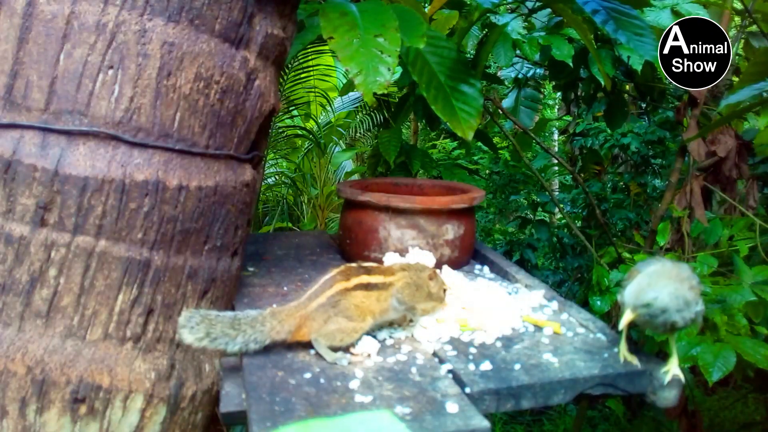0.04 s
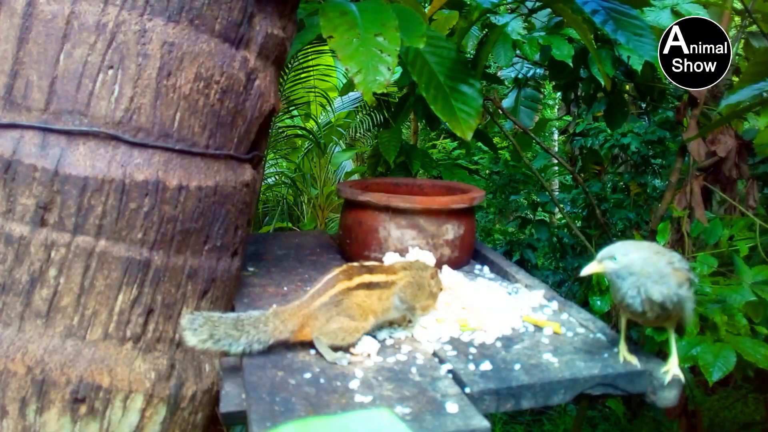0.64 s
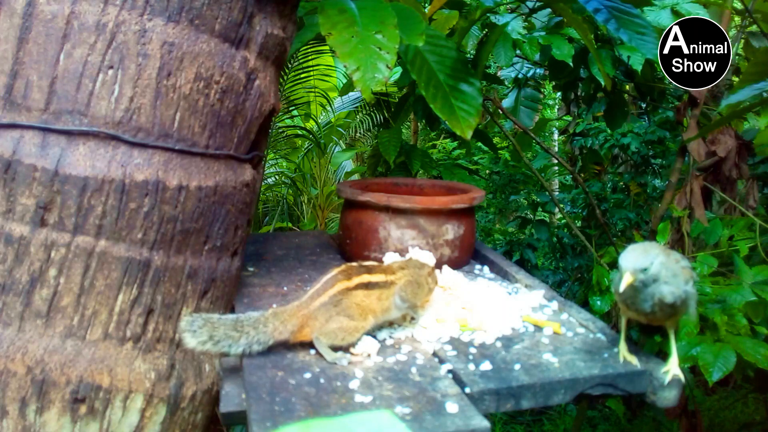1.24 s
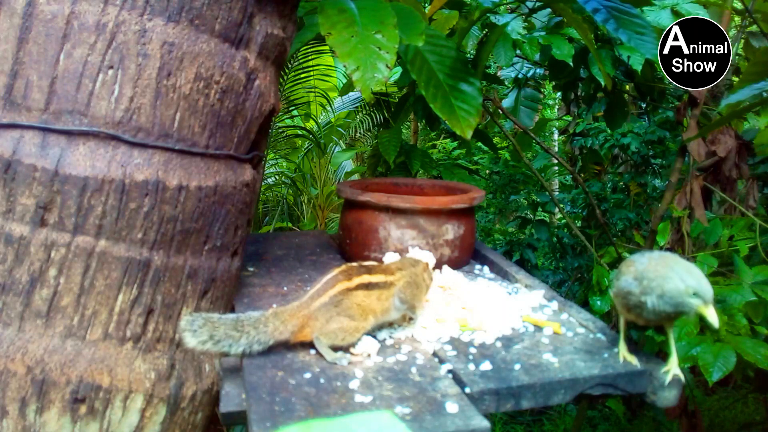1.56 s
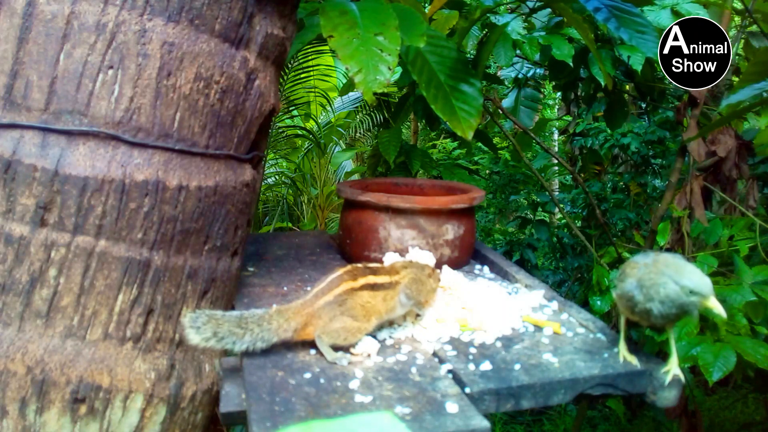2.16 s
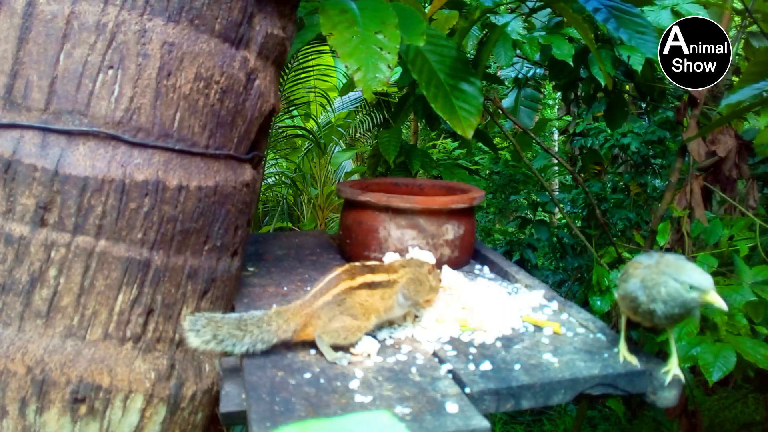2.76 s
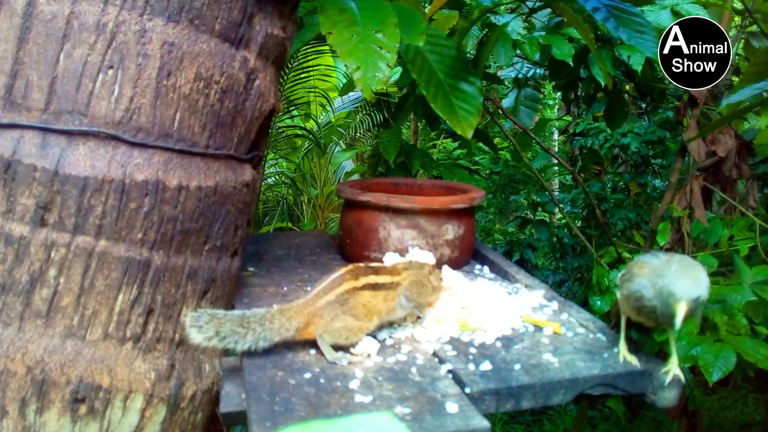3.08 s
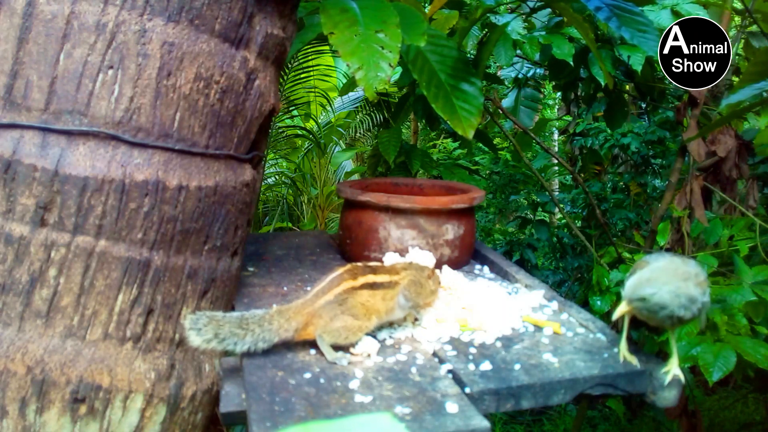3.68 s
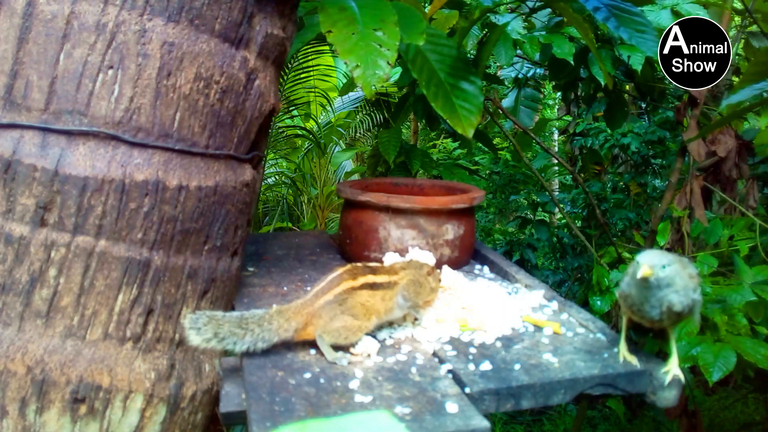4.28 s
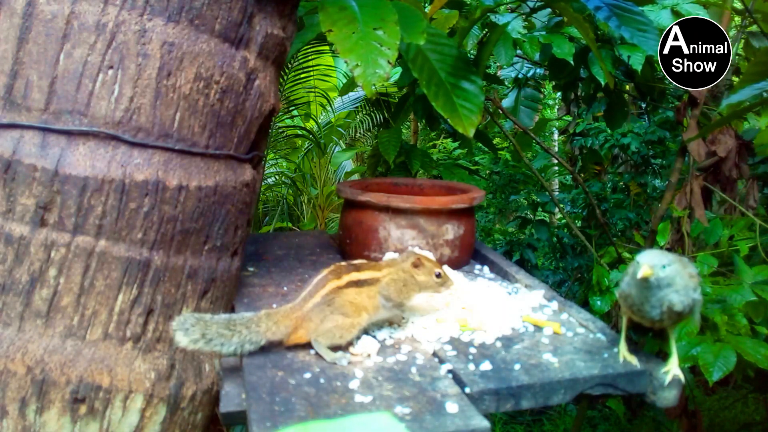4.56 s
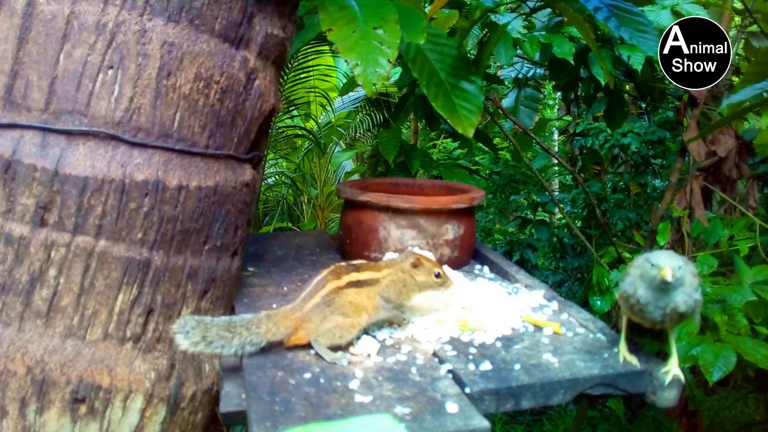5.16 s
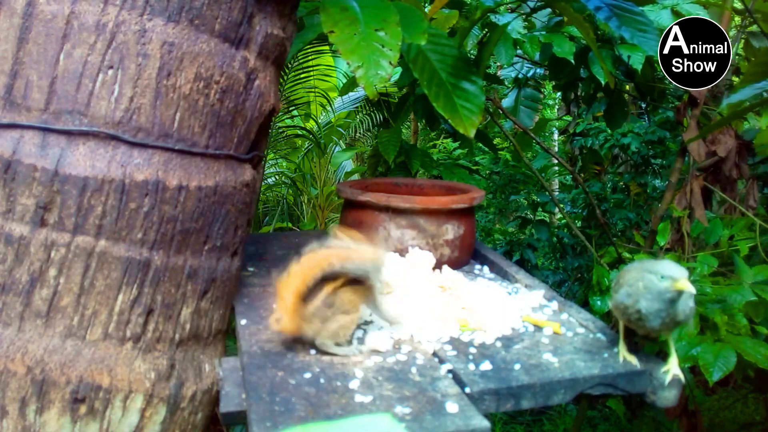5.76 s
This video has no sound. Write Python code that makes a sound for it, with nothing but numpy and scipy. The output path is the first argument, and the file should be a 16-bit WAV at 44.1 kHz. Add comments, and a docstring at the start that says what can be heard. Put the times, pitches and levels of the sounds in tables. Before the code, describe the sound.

In a leafy garden, a bird repeats short, sharp chirps, some clear and some harsh, while others whistle farther off. Past the middle, a second bird adds a few thin, high squeals. At the end a squirrel squeaks briefly and bolts, its feet thumping a board and its claws scratching bark close to the microphone. Faint pulsing insects and a low rumble of distant traffic lie underneath.

```python
"""A bird repeats sharp chips, some clear and some harsh, in a leafy garden where a babbler and a palm
squirrel feed on a board. The babbler squeals with both sides of its syrinx; other birds whistle farther
off, scattered by the foliage. At the end the squirrel squeaks and bolts up a trunk, thumping the board
and scratching the bark. Behind them lie pulsing insects, a distant idling engine, far traffic and a
thin high hiss."""
import sys
import numpy as np
from scipy import signal
from scipy.fft import rfft, irfft, next_fast_len
from scipy.io import wavfile
from scipy.ndimage import map_coordinates

SR = 44100
rng = np.random.default_rng(int(sys.argv[2]) if len(sys.argv) > 2 else 0)


def persist_wave(psi):
    """Save psi, clipped to +-1, as 16-bit WAV."""
    counts = np.round(np.clip(psi, -1, 1) * 32767).astype(np.int16)
    wavfile.write(sys.argv[1], SR, np.atleast_2d(counts).T)


N = 265923
TIME = np.arange(N) / SR
CUTOFF_HZ = 15850

# chip cues: (time [s], top pitch [Hz], relative level [dB], harshness [0-1], brightness [dB])
CHIPS = [(-.06, 2537, -44, .05, 3.5), (0.221, 2500, -35, 0.36, 0), (1.694, 2586, -33.5, 0.3, -2),
         (2.079, 2541, -34.5, 0, 1.5), (2.333, 2523, -35, 0.5, 0.5), (2.720, 2530, -34.5, 0.2, 0.5),
         (4.371, 2605, -32.5, 0.1, 1.5), (4.734, 2600, -35, 0.65, 0), (4.958, 2595, -34, 0.6, 2),
         (5.256, 2579, -33, 0.27, 1), (5.543, 2546, -34.5, .05, 2.5), (5.867, 2535, -34, 0.12, 4.5)]
# a clear chip slides up, leaps and holds: (time from cue [s], pitch [ratio], gain [dB])
CLEAR_CHIP = [(-.015, .7, -22), (-.009, .75, -11), (-.004, .81, -8), (-.001, .93, -5), (.003, .995, 0),
              (.013, 1, 0), (.016, .97, -8), (.019, .85, -30)]
# a harsh chip dips in the middle: (time from cue [s], pitch [ratio], gain [dB])
HARSH_CHIP = [(-.012, 0.94, -48), (-.006, 0.97, -3.5), (0, 1, -1), (.004, .88, -4.5), (.01, .86, -3.5),
              (.015, 1, 0.5), (.02, 1, -2.5), (.027, 0.83, -33)]
# the raw tone at the syrinx, harmonic by harmonic: (gain [dB])
CHIP_PARTIALS = [-0.5, -1, -0.5, -17, -21, -13]
# throat resonances: (frequency [Hz], gain [dB])
CHIP_THROAT = [(1500, -24), (1900, -1), (2540, -2), (3100, -10), (3900, -2.5), (4450, -14.5), (5080, -6.5),
               (5450, -6.5), (5850, -1), (7600, -22), (8400, -28), (11500, -10), (15300, -14)]
def chips(jitter=0.0022, harsh_jitter=0.019, onset_jitter=0.06, hiss_db=-12, harsh_hiss_db=9, trim_db=2):
    """Short calls from a perch, hoarse as the voice starts; a harsh one stays unsteady and hisses."""
    out = np.zeros(N)
    t = span(-.015, .028)
    for cue, top_hz, db, harsh, bright_db in CHIPS:
        ratio, shape_db = along(HARSH_CHIP if harsh > .5 else CLEAR_CHIP, t)
        unsteady = jitter + harsh_jitter * harsh + onset_jitter * (t < 0)
        hz = top_hz * ratio * (1 + unsteady * wobble(1126, t))
        partials_db = [CHIP_PARTIALS[0]] + [overtone + bright_db for overtone in CHIP_PARTIALS[1:]]
        tone = voice(hz, partials_db) * from_db(shape_db)
        # air hisses before the tone has built up, so its envelope is flatter
        air_db = hiss_db + bright_db + harsh_hiss_db * harsh + 0.27 * shape_db
        hiss = from_db(air_db) * rng.standard_normal(len(t))
        call = coloured((tone + hiss) * from_db(db + trim_db) * gate(t), CHIP_THROAT)
        add(out, cue + t[0], garden(call, wet_db=-5, shade_hz=2470, t60=0.33, gap=0.0087))
    return out


def puffs(delay=.03, length=0.042, gain_db=-28):
    """A faint low puff follows each chip."""
    out = np.zeros(N)
    for cue, _, db, _, _ in CHIPS:
        t, u = note(cue + delay, length)
        add(out, t[0], from_db(db + gain_db) * np.sin(np.pi * u) * band_noise(t, 600, 1050))
    return out


# loud arched squeals, low side of the syrinx:
# (time [s], length [s], top pitch [Hz], level [dB], fall [share of pitch], overtone drive [dB])
SQUEALS = [(3.76, .066, 5130, -31, 0.201, -15), (4.368, 0.064, 5320, -32, 0.21, -12.5),
           (4.417, 0.053, 5014, -34, .06, -7.5), (4.472, .065, 5163, -32.5, .19, -14)]
# slurs, high side: (time [s], length [s], first pitch [Hz], last pitch [Hz], level at resonance [dB])
SLURS = [(3.759, 0.032, 6390, 6140, -32), (3.925, .061, 7330, 6200, -35), (4.112, 0.011, 6200, 6250, -45),
         (4.425, 0.068, 7700, 6330, -37.5)]
# soft falling peeps, mostly heard at the octave:
# (time [s], length [s], first pitch [Hz], last pitch [Hz], level [dB], overtone drive [dB])
PEEPS = [(3.708, 0.054, 4720, 4560, -68, -0.5), (3.911, 0.045, 5020, 4080, -67.5, 12),
         (4.071, .035, 5010, 4620, -73.5, 13.5), (5.585, 0.034, 5100, 4830, -66.5, 7.5)]
def babbler(crest=0.553, scoop=0.0396, attack_db=11, release_db=10.5, beak_hz=6110):
    """Two voices: one scoops up and drops away, the other slides down above it; soft peeps between."""
    out = np.zeros(N)
    for start, length, top_hz, db, fall, overtone_db in SQUEALS:
        t, u = note(start, length)
        rising = np.maximum(1 - u / crest, 0) ** 2
        falling = np.maximum((u - crest) / (1 - crest), 0) ** 1.7
        roughness = 0.017 * np.sqrt(falling) * wobble(1500, t)
        hz = top_hz * (1 - scoop * rising - fall * falling + roughness)
        add(out, start, babbler_note(t, hz, db - attack_db * rising - release_db * falling, overtone_db))
    for start, length, first_hz, last_hz, db in SLURS:
        t, u = note(start, length)
        hz = first_hz + (last_hz - first_hz) * np.sin(np.pi * u ** 1.6 / 2) ** 2
        off_beak_db = 36 * np.abs(np.log2(hz / beak_hz))   # a slur swells near the beak's resonance
        add(out, start, babbler_note(t, hz, db - off_beak_db, overtone_db=-17))
    for start, length, first_hz, last_hz, db, overtone_db in PEEPS:
        t, u = note(start, length)
        add(out, start, babbler_note(t, first_hz + (last_hz - first_hz) * u, db, overtone_db))
    return out


def babbler_note(t, hz, db, overtone_db, jitter=0.0058, rasp=0.17, hiss_db=-12):
    """One thin note; hiss grows with the overtones as the voice is pressed."""
    phase = turning(hz * (1 + jitter * wobble(817, t)))
    hiss = from_db(hiss_db) * band_noise(t, 5600, 11300)
    # notes that sound mainly at the octave have hardly any third harmonic
    third = from_db(-8 - 2 * np.maximum(overtone_db, 0)) * (3 * hz < CUTOFF_HZ) * np.sin(3 * phase)
    # alternate cycles differ a little, which puts weak lines between the harmonics
    between = from_db(-17) * (np.sin(3 * phase / 2) + np.sin(5 * phase / 2)) * (overtone_db < 0)
    overtones = from_db(overtone_db + 2.5) * (np.sin(2 * phase) + third + between + hiss)
    call = (np.sin(phase) + overtones) * (1 + rasp * wobble(697, t))
    call *= np.sqrt(2) * from_db(db) * gate(t, edge=0.0023)
    return garden(call, wet_db=-4.3, shade_hz=11700, t60=0.27, gap=0.0016)


# the squirrel's nasal throat: (frequency [Hz], gain [dB])
SQUEAK_THROAT = [(600, -2), (830, 2), (1660, 0.5), (2500, -2.5), (3300, -9), (4200, -14), (5000, -18),
                 (6000, -28), (15000, -26)]
def squirrel_squeak(start=5.85, peak=5.884, end=5.9, slack_hz=592, top_hz=835, jitter=0.22):
    """Effort builds and collapses; pitch and level rise with it, and the hoarse voice clears."""
    out, t = np.zeros(N), span(start, end)
    slack = np.interp(t, [start, peak, end], [1, 0, 1])
    hz = (top_hz + (slack_hz - top_hz) * slack ** 2) * (1 + jitter * slack * wobble(898, t))
    source = voice(hz, np.zeros(18)) * from_db(-30 - 14.5 * slack) * gate(t)
    add(out, t[0], garden(coloured(source, SQUEAK_THROAT), wet_db=-26, shade_hz=14000, t60=0.15))
    return out


# the gritty tone of scrabbling feet: (frequency [Hz], gain [dB])
SCRABBLE_COLOUR = [(60, -6), (200, 16), (600, 0.5), (2000, -7), (5000, -15), (15000, -11.5)]
def scrabble(start=5.735, jump=5.961, fade=0.018, grain_db=3.5):
    """Crumbs scatter and the board shudders, ever louder as the squirrel gathers speed."""
    out, t = np.zeros(N), span(start - fade, N / SR + fade)
    airborne = bump(jump, 0.011, t)   # the crumbs lull during the jump
    crumbs_db = -52.5 + 72.5 * (t - start) - 15 * airborne
    grit = coloured(rng.standard_normal(len(t)), SCRABBLE_COLOUR)
    crumbs = from_db(crumbs_db) * rms_one(grit * from_db(grain_db * wobble(500, t)))
    rumble = from_db(-45 + 39 * (t - start)) * band_noise(t, 45, 150)
    add(out, t[0], (crumbs + rumble) * gate(t, edge=fade))
    return out


# footfalls on the board: (centre time [s], peak level [dB], pitch [Hz])
THUMPS = [(5.8, -30, 80), (5.843, -25, 86), (5.892, -19, 112), (5.94, -11.5, 69), (6.011, -22, 110),
          (6.018, -12, 460), (6.025, -5.5, 131), (6.028, -10, 280)]
def board_thumps(cycles=2.1):
    """Soft feet rock the board for about two cycles."""
    out = np.zeros(N)
    for centre, db, hz in THUMPS:
        length = cycles / hz
        t = span(-length / 2, length / 2)
        envelope = from_db(db) * np.cos(np.pi * t / length) * gate(t)
        add(out, centre + t[0], envelope * np.cos(2 * np.pi * hz * t))
    return out


# claw hits: (time [s], level [dB], low edge [Hz])
SCRATCHES = [(4.065, -51.5, 400), (5.744, -48, 1200), (5.832, -37, 300), (5.906, -36.5, 450),
             (5.947, -36, 900), (5.981, -39, 3000), (6.002, -35, 1500), (6.012, -16.5, 6150),
             (6.024, -20.5, 7540)]
def claw_scratches(decay_s=0.0032, octaves=3):
    """Claws catch on wood and bark in dry, fast-dying bursts of noise."""
    out, t = np.zeros(N), span(0, .06)
    for start, db, low_hz in SCRATCHES:
        add(out, start, from_db(db) * np.exp(-t / decay_s) * band_noise(t, low_hz, low_hz * 2 ** octaves))
    return out


# whistled notes: (time [s], length [s], first pitch [Hz], last pitch [Hz], relative level [dB],
# closing flick [share of pitch], undertone [0-1])
WHISTLES = [(0.518, 0.13, 3640, 3746, -53.5, 0, 0.03), (1.283, 0.14, 3252, 3280, -45.5, 0.12, 0.87),
            (1.453, 0.12, 3326, 3127, -43.5, .11, .7), (1.619, 0.11, 3090, 2945, -42, 0, 0.04),
            (3.107, 0.14, 3570, 3780, -59, 0, 0.1), (3.271, 0.13, 3705, 3820, -64, 0, 0),
            (5.147, .065, 4050, 2950, -60, 0, 0), (5.206, .095, 3350, 3040, -54.5, 0, 0)]
# the whistle's core tone: (pitch multiple [ratio], gain [dB])
WHISTLE_PARTIALS = [(1, -1), (3, -25)]
# its undertone, an octave down: (pitch multiple [ratio], gain [dB])
UNDERTONE_PARTIALS = [(.5, -15.5), (1.5, -25), (2.5, -23)]
def whistles(scoop=.055, sag=0.0126, slide_jitter=0.027, far_below_db=-52):
    """Nearly pure notes glide and sag in the trees; fast slides roughen, far notes blur in echoes."""
    out = np.zeros(N)
    for start, length, first_hz, last_hz, db, flick, undertone in WHISTLES:
        t, u = note(start, length)
        far, rising = db < far_below_db, last_hz > first_hz
        arch = np.sin(np.pi * u)
        glide = (1 + np.tanh((u - .47) / 0.11)) / 2 if far and rising else u   # a step up, or a ramp
        opening = undertone * np.exp(-(t - t[0]) / 0.0161)   # with an undertone it starts soft and flat
        closing = np.clip((t - t[-1] + 0.0266) / .017, 0, 1) * (flick > 0)   # a flick rises and weakens
        bend = 1 - scoop * opening - sag * arch + flick * closing
        hz = (first_hz + (last_hz - first_hz) * glide) * bend
        unsteady = (0.0076 if far else 0.0063) + slide_jitter * (closing + (far and not rising))
        phase = turning(hz * (1 + unsteady * wobble(400, t)))
        tone = sines(phase, WHISTLE_PARTIALS) + undertone * arch * sines(phase, UNDERTONE_PARTIALS)
        level_db = db - 2 * far - 11 * opening - 2.5 * (1.5 - arch) - 2 * closing
        call = np.sqrt(2) * tone * from_db(level_db) * gate(t, edge=0.0032)
        add(out, start, garden(call, wet_db=-2 if far else -9, shade_hz=9000, t60=0.31))
    return out


# soft far calls: (time [s], pitch [Hz], relative level [dB])
FAR_CALLS = [(.56, 2230, -64), (0.789, 2450, -64.5), (1.02, 2200, -63.5), (1.47, 2237, -62),
             (1.98, 2390, -65), (2.44, 4110, -62.5), (2.57, 4170, -63), (2.73, 4360, -61),
             (2.87, 2396, -63.5), (3.26, 2285, -62), (3.42, 1900, -70.5), (3.73, 2310, -59),
             (4.17, 2340, -58.5), (4.62, 2266, -61.5)]
def far_birds(length=0.106, rise=0.031, waver=0.052, trim_db=-2.5):
    """Distant husky calls, each rising a little, arrive mostly as scattered sound."""
    out = np.zeros(N)
    for start, centre_hz, db in FAR_CALLS:
        t, u = note(start, length)
        hz = centre_hz * (1 + rise * (u - .5) + waver * wobble(592, t))
        call = np.sin(turning(hz)) * np.sin(np.pi * u) * from_db(db + trim_db)
        add(out, start, garden(call, wet_db=1, shade_hz=5000, t60=0.56))
    return out


# the sheen of far insects: (frequency [Hz], gain [dB])
CHORUS_COLOUR = [(5000, -17.5), (5600, -10), (6100, 0.5), (6600, -1), (6950, 6.5), (7250, -4.5),
                 (7600, -16), (8200, -40)]
def insects(period=.1029, spacing=0.022, stroke=0.0185, high_hz=7200, low_hz=5400, chorus_db=-3):
    """A near insect rasps in threes, each wing stroke falling in pitch, over a steady far chorus."""
    out, t = np.zeros(N), span(0, stroke)
    for start in np.arange(0.055, TIME[-1], period):
        for k in range(3):
            late, loud, sharp = rng.standard_normal(3)
            hz = np.linspace(high_hz, low_hz, len(t)) * (1 + 0.0152 * sharp + 0.02 * wobble(930, t))
            rasp = np.sqrt(2) * np.sin(turning(hz)) * np.sin(np.pi * t / stroke) ** 2
            add(out, start + k * spacing + .002 * late, rasp * from_db(2.5 - 1.15 * k + 1.16 * loud))
    near = garden(out, wet_db=-9, shade_hz=16000, t60=.15)[:N]
    return near + from_db(chorus_db) * noise(CHORUS_COLOUR)


# the engine's throb: (firing-rate multiple [ratio], relative level [dB])
ENGINE_ORDERS = [(1, -29), (2, -1.5), (3, 2), (4, -2.5), (5, -2.5), (6, -12.5)]
# its fader ride: (time [s], relative level [dB])
ENGINE_LEVEL = [(0, -59), (.8, -49), (1.3, -48.5), (3.5, -54.5), (3.95, -50.5), (4.5, -49), (4.65, -54.5),
                (5.05, -50), (5.65, -53)]
def engine(firing_hz=25.64, drift=0.01206, flutter=0.14, trim_db=-2):
    """Only the low orders of a slow idling engine carry this far."""
    level_db, = along(ENGINE_LEVEL, TIME)
    phase = turning(firing_hz * (1 + drift * wobble(2.98, TIME)))
    throb = sum(from_db(db) * (1 + flutter * wobble(13, TIME)) * np.cos(k * phase)
                for k, db in ENGINE_ORDERS)
    return from_db(level_db + trim_db) * rms_one(throb)


# the drone's fader ride: (time [s], level [dB])
DRONE_LEVEL = [(0, -77), (.5, -68), (1.1, -56.5), (1.8, -59.5), (2.5, -66), (3.2, -71), (6, -80)]
# its narrow hum: (frequency [Hz], gain [dB])
DRONE_COLOUR = [(280, -25), (315, -16), (348, 4.5), (390, -17.5), (450, -5.5), (520, -11), (700, -23)]
def traffic_drone():
    """A low drone of far traffic swells and fades."""
    level_db, = along(DRONE_LEVEL, TIME)
    return from_db(level_db) * noise(DRONE_COLOUR)


# the fader ride that road and hiss both follow: (time [s], relative level [dB])
WASH_LEVEL = [(0.0, -60), (0.57, -62), (1.2, -61), (1.95, -60), (2.91, -63), (3.15, -66), (5.65, -64.5)]
# bass-heavy road wash: (frequency [Hz], gain [dB])
ROAD_COLOUR = [(25, -15), (50, 8), (90, 12), (140, 2.5), (190, -1), (350, 1), (480, -3), (700, -6.5),
               (1200, -15), (2200, -18.5), (4500, -23), (8000, -29.5)]
# thin high hiss, probably far insects: (frequency [Hz], gain [dB])
HIGH_HISS_COLOUR = [(1500, -6), (4000, 4), (8300, 1), (9200, 11), (9800, 14), (10700, 4), (13000, 6),
                    (18000, -6)]
# the band that ducks in the lull: (frequency [Hz], gain [dB])
LULL_BAND = [(2100, 0), (4300, 1)]
def road_and_hiss(road_gain_db=9.5, hiss_db=-71.5, hiss_follow=.47, lull_db=7.5):
    """A far road and a thin high hiss rise and fall together; the mids dip just before the squeals."""
    wash_db, = along(WASH_LEVEL, TIME)
    road = from_db(wash_db + road_gain_db) * noise(ROAD_COLOUR)
    hiss = from_db(hiss_db + hiss_follow * (wash_db - wash_db.mean())) * noise(HIGH_HISS_COLOUR)
    duck = 1 - from_db(-lull_db * bump(3.6, 0.22, TIME))
    return road + hiss - duck * coloured(road + hiss, LULL_BAND)


# a narrow band of treble: (frequency [Hz], gain [dB])
BUZZ_COLOUR = [(9000, -8.5), (9800, 2), (10500, -11)]
def high_buzz(peak_db=-66.5):
    """A thin high buzz swells once and fades."""
    return from_db(peak_db) * bump(0.49, .22, TIME) * noise(BUZZ_COLOUR)


def garden(sound, wet_db, shade_hz, t60, gap=0.003):
    """Leaves shade the direct path's treble; trunks and foliage scatter a short bright tail."""
    t = np.arange(SR * 3 // 5) / SR
    paths = rng.standard_normal(len(t)) * (rng.random(len(t)) < (1500 + 30000 * t) / SR)
    echoes = paths * from_db(-60 * t / t60) * np.clip(t / gap, 0, 1) ** 2
    tail = signal.fftconvolve(sound, echoes)
    tail *= from_db(wet_db) * np.sqrt(np.sum(sound ** 2) / np.sum(tail ** 2))
    pole = np.exp(-2 * np.pi * shade_hz / SR)
    return tail + signal.lfilter([1 - pole], [1, -pole], np.pad(sound, (0, len(t) - 1)))


def voice(hz, partials_db):
    """Harmonics on a pitch curve, each at its own rms level."""
    phase = turning(hz)
    return np.sqrt(2) * sum(from_db(db) * (k * hz < SR / 2) * np.sin(k * phase)
                            for k, db in enumerate(partials_db, 1))


def sines(phase, partials):
    """Partials locked to one phase."""
    return sum(from_db(db) * np.sin(k * phase) for k, db in partials)


def turning(hz):
    """Phase of an oscillator that follows a pitch curve."""
    return 2 * np.pi * np.cumsum(hz) / SR


def coloured(x, colour):
    """EQ a sound with a curve on a log-frequency axis, rolling off beyond its ends."""
    size = next_fast_len(len(x) + 1024)
    hz = np.fft.rfftfreq(size, 1 / SR) + 1
    points_hz, db = np.transpose(colour)
    gain = from_db(np.interp(np.log(hz + 1), np.log(points_hz), db))
    ends = 1 / (1 + (.8 * points_hz[0] / hz) ** 6) / (1 + (.8 * hz / points_hz[-1]) ** 8)
    return irfft(rfft(x, size) * gain * ends, size)[:len(x)]


def noise(colour):
    """A noise bed with the given spectrum; rms 1."""
    return rms_one(coloured(rng.standard_normal(N), colour))


def band_noise(t, low_hz, high_hz):
    """Band-passed noise as long as t; rms 1."""
    sos = signal.butter(2, [low_hz, min(high_hz, SR * 9 / 20)], "band", fs=SR, output="sos")
    return rms_one(signal.sosfilt(sos, rng.standard_normal(len(t))))


def wobble(rate, t):
    """Smooth random modulation through `rate` values a second; spread near 1."""
    return map_coordinates(rng.standard_normal(4096), [(t - t[0]) * rate], order=2, mode="wrap")


def bump(centre, width, t):
    """A smooth swell from 0 to 1 and back."""
    return np.exp(-((t - centre) / width) ** 2)


def gate(t, edge=0.0031):
    """Soft start and stop of a note."""
    return np.clip(np.minimum(t - t[0], t[-1] - t) / edge, 0, 1)


def along(rows, t):
    """The columns of a curve at the times t."""
    times, *columns = np.transpose(rows)
    return [np.interp(t, times, column) for column in columns]


def span(start, end):
    """Sample times from start to end."""
    return np.arange(round(start * SR), round(end * SR)) / SR


def note(start, length):
    """Sample times of a note, and its progress from 0 to 1."""
    t = span(start, start + length)
    return t, np.linspace(0, 1, len(t))


def add(out, start, sound):
    """Mix a sound in at a time."""
    i = round(start * SR) + np.arange(len(sound))
    inside = (i >= 0) & (i < N)
    out[i[inside]] += sound[inside]


def from_db(db):
    """Decibels to gain."""
    return 10 ** (np.asarray(db) / 20)


def rms_one(x):
    """Scale to unit power."""
    return x / np.sqrt(np.mean(x ** 2) + 1e-20)


def scene(insect_gain_db=-57):
    """The mono mix: birds and squirrel over the garden bed."""
    traffic = traffic_drone() + engine()
    birds = chips() + puffs() + babbler() + whistles() + far_birds()
    bed = road_and_hiss() + high_buzz() + from_db(insect_gain_db) * insects()
    squirrel = squirrel_squeak() + scrabble() + board_thumps() + claw_scratches()
    return (birds + squirrel + bed + traffic)[None]


def record(dry):
    """A steep high cut on the whole mix."""
    return signal.sosfilt(signal.ellip(10, .2, 90, CUTOFF_HZ, fs=SR, output="sos"), dry)


dry = scene()
out = record(dry)
persist_wave(out)
```